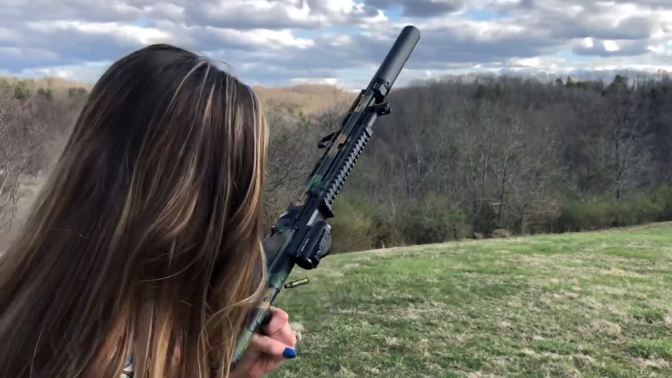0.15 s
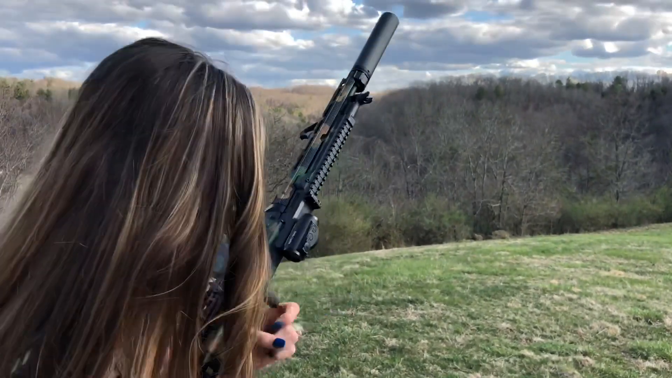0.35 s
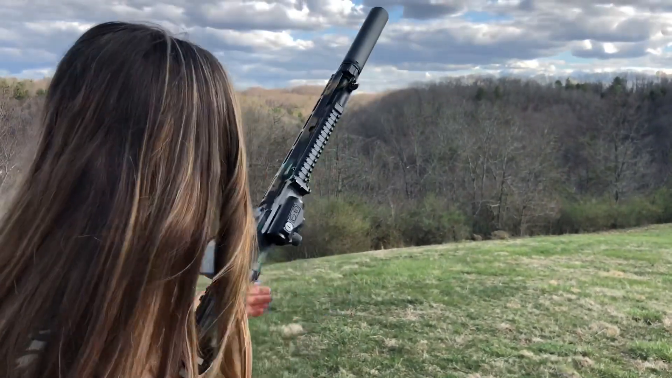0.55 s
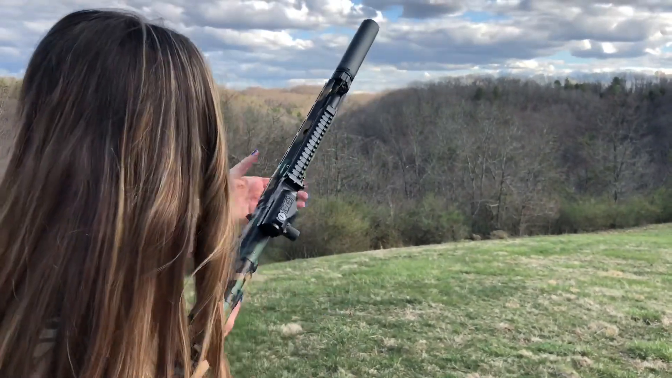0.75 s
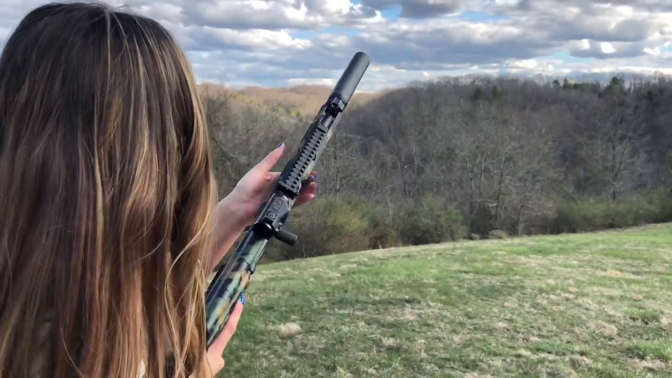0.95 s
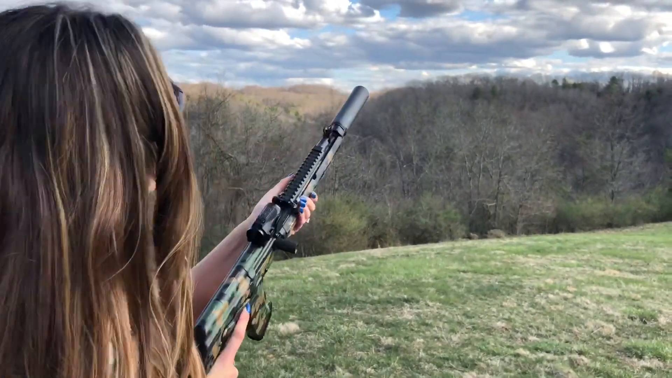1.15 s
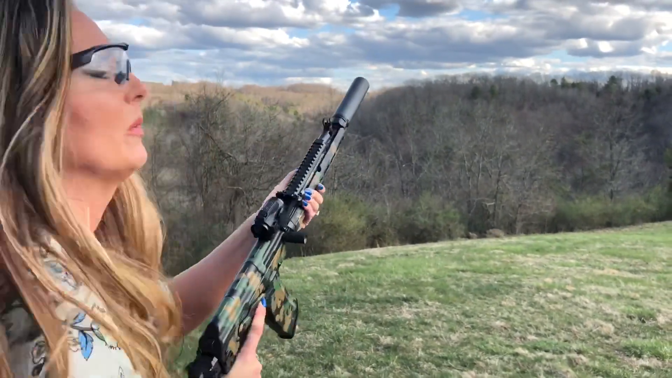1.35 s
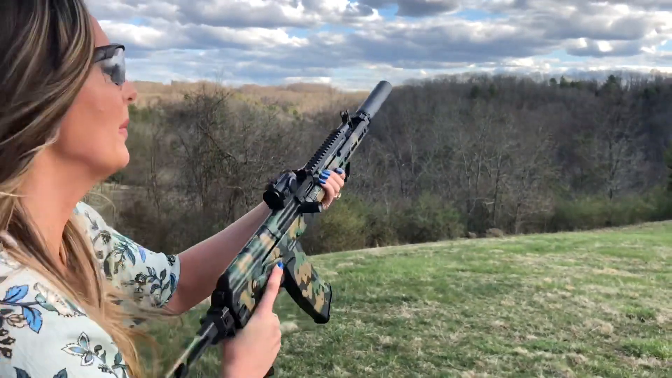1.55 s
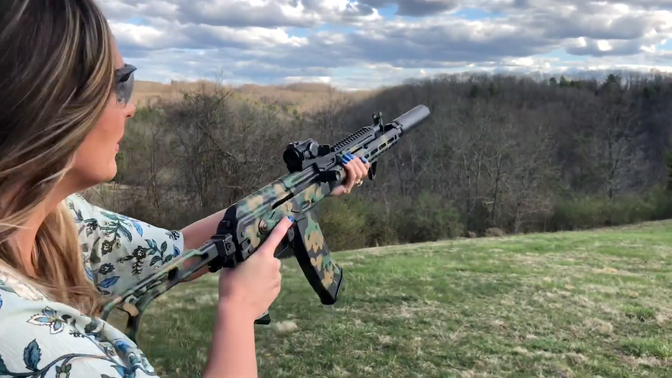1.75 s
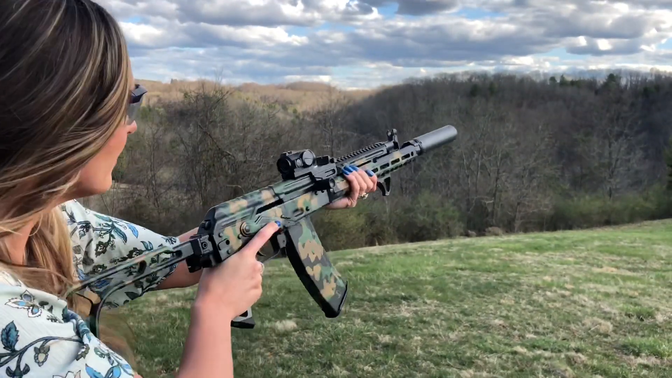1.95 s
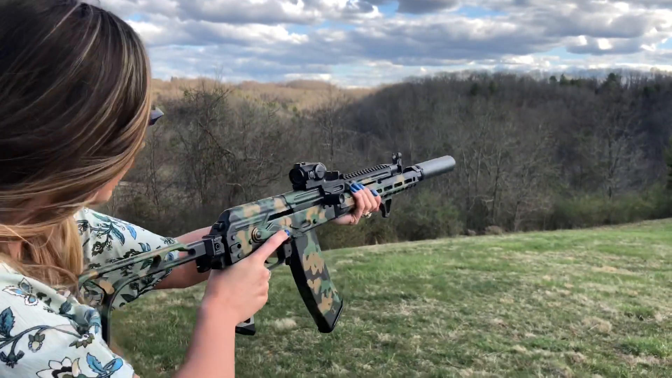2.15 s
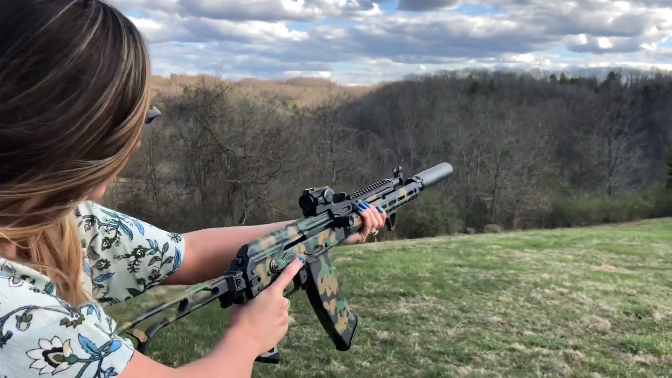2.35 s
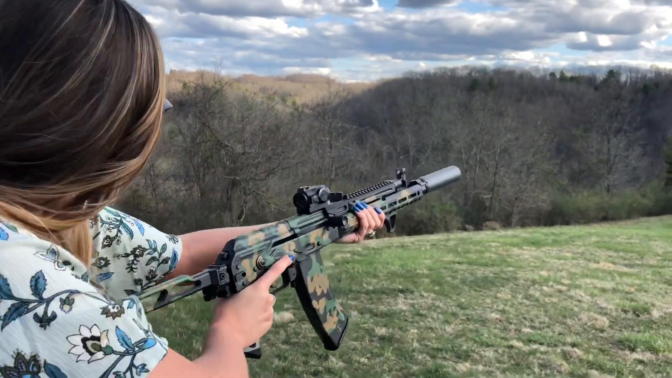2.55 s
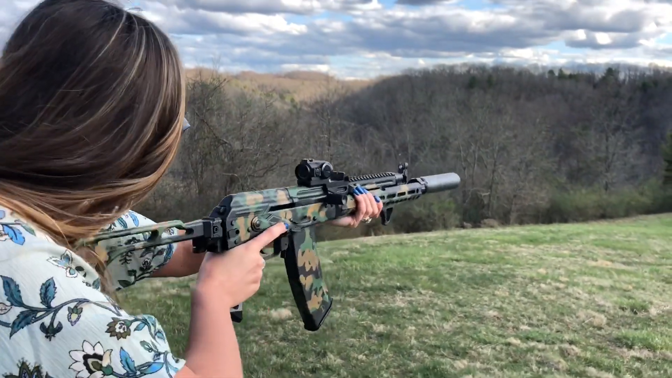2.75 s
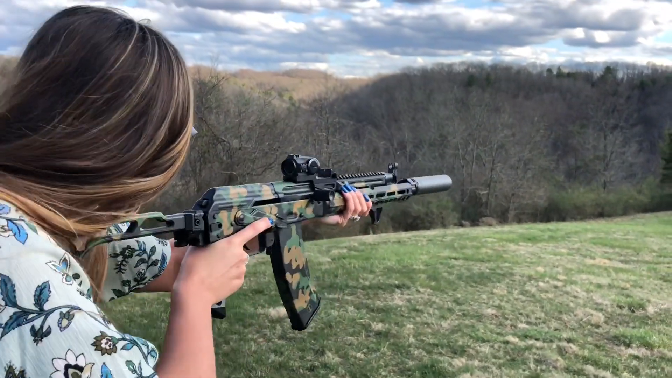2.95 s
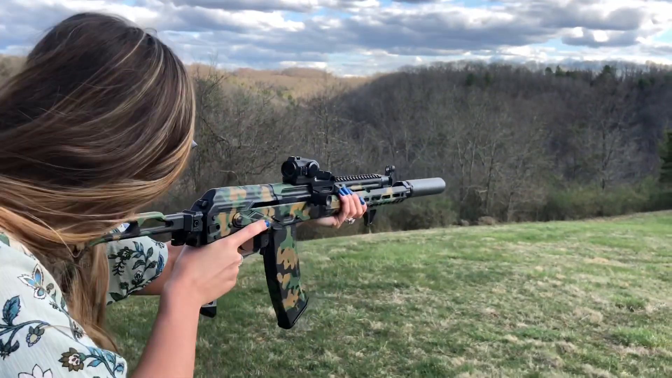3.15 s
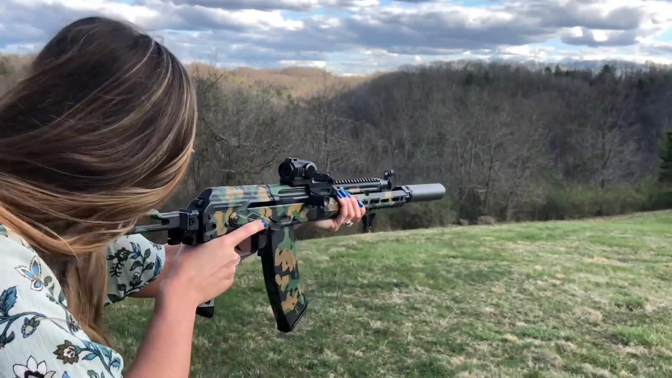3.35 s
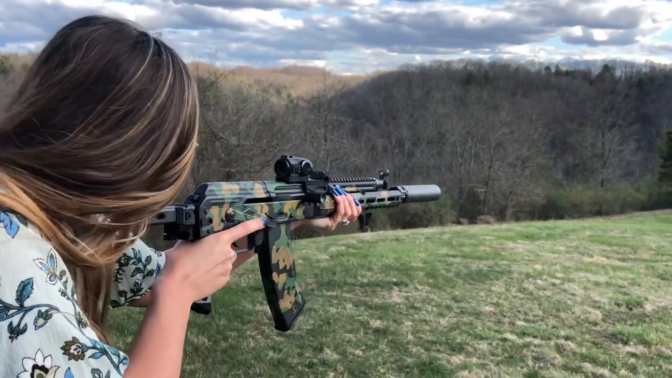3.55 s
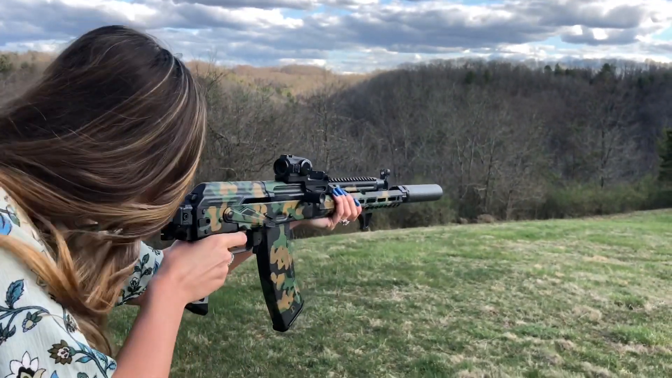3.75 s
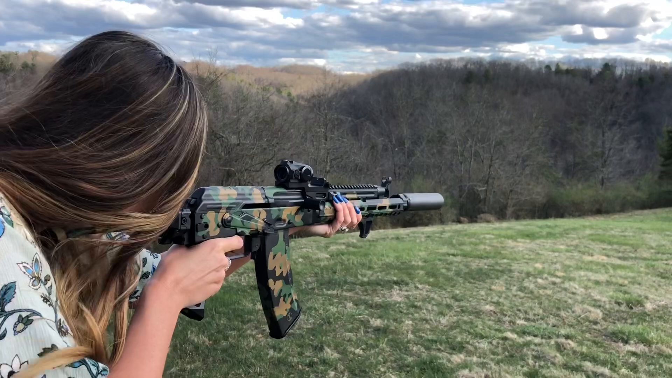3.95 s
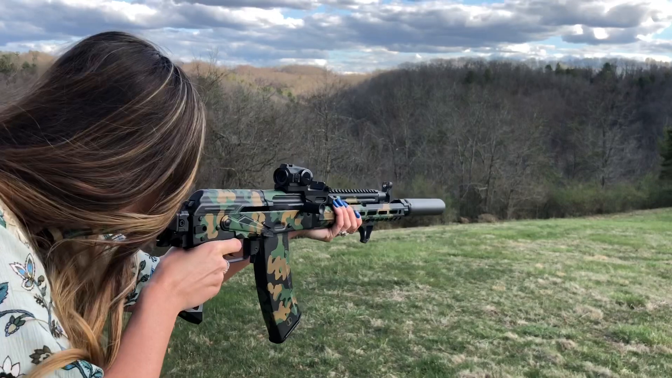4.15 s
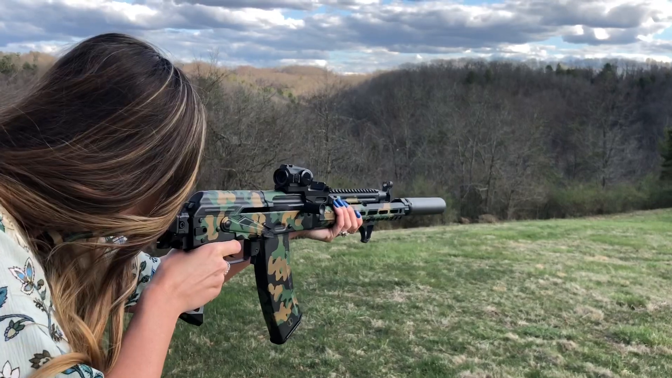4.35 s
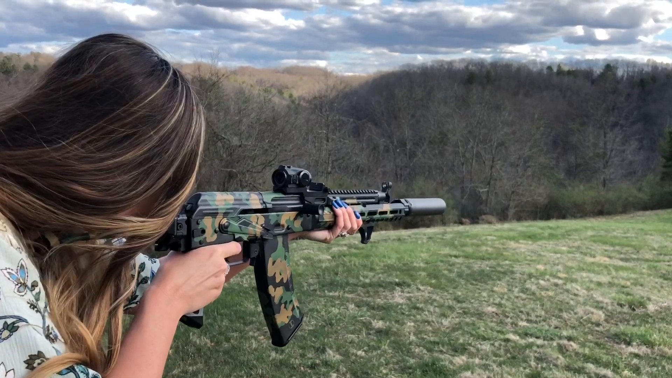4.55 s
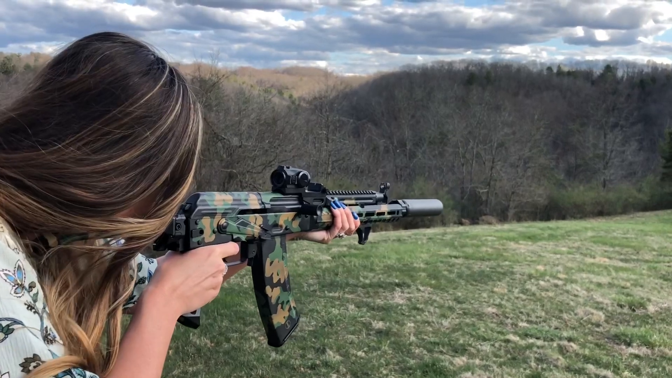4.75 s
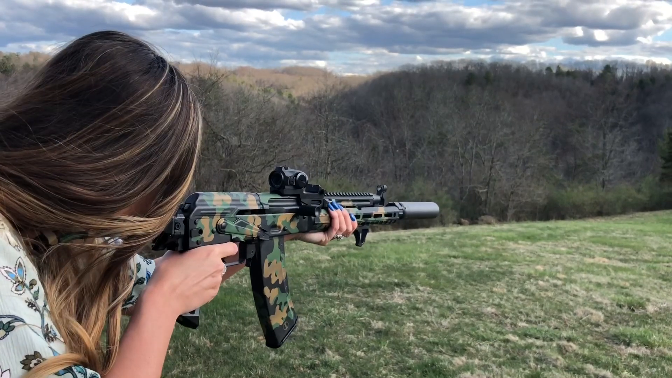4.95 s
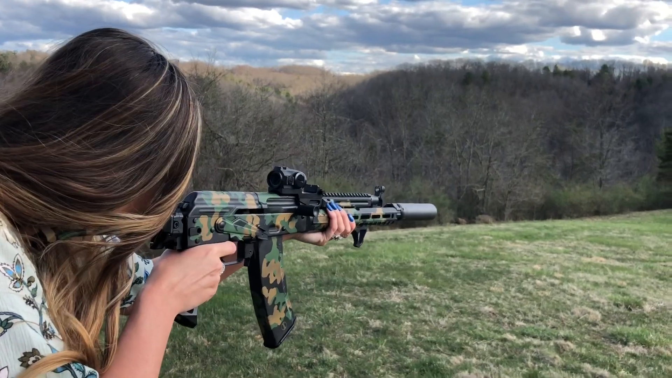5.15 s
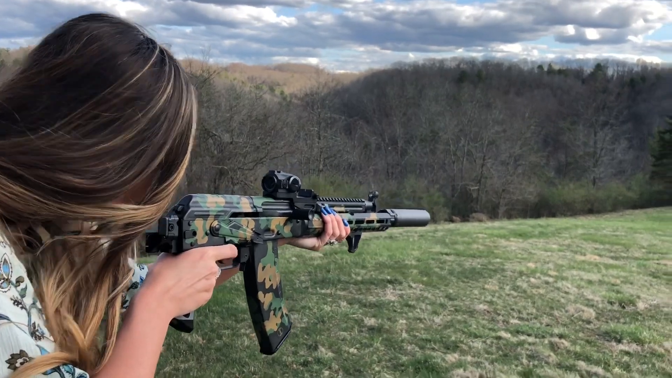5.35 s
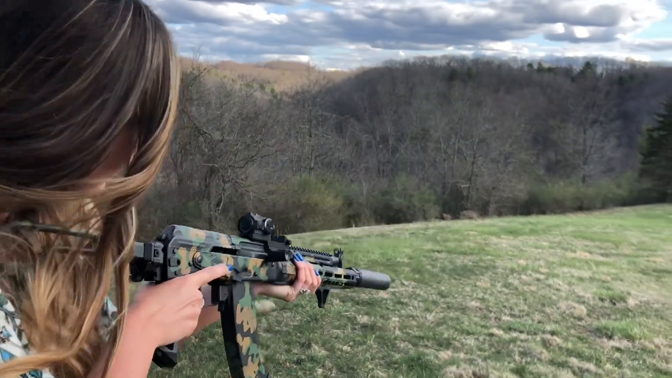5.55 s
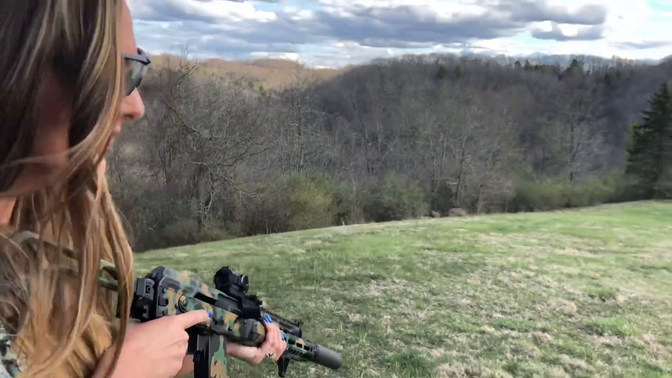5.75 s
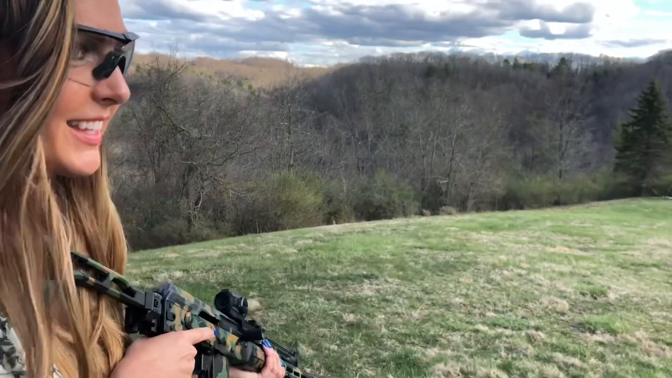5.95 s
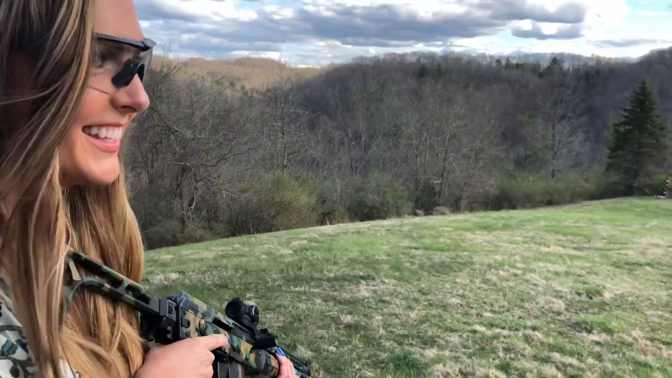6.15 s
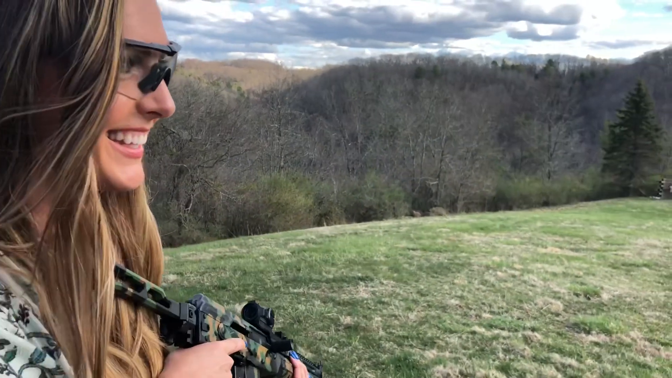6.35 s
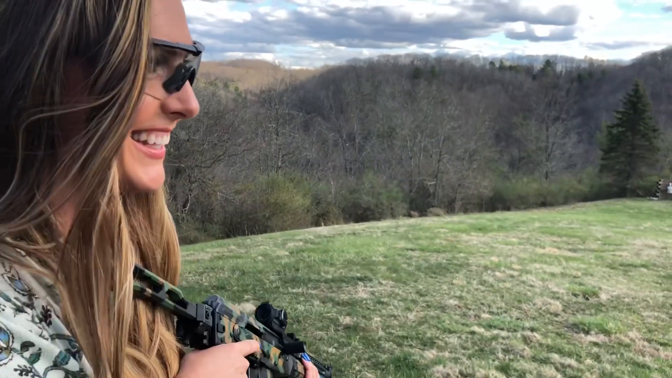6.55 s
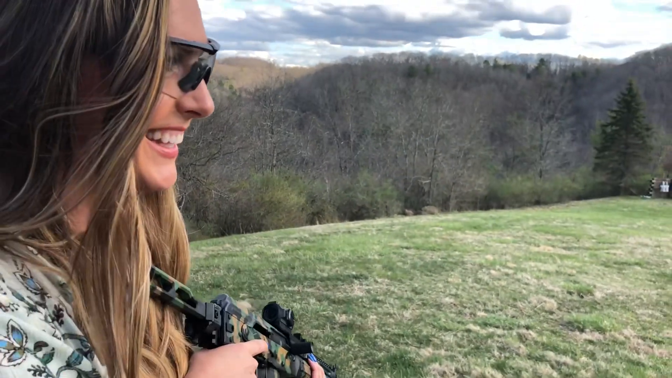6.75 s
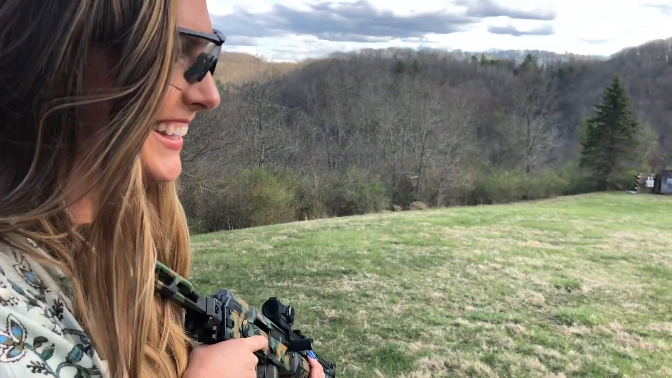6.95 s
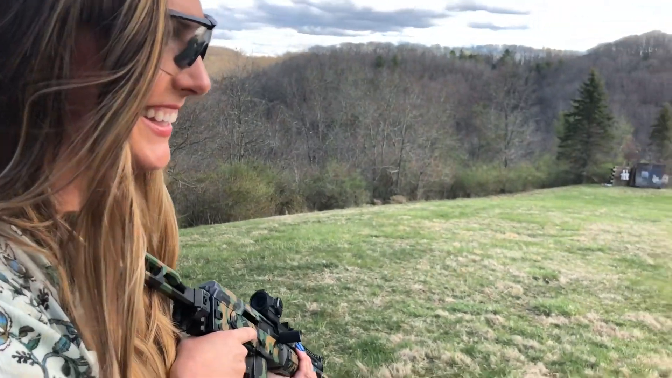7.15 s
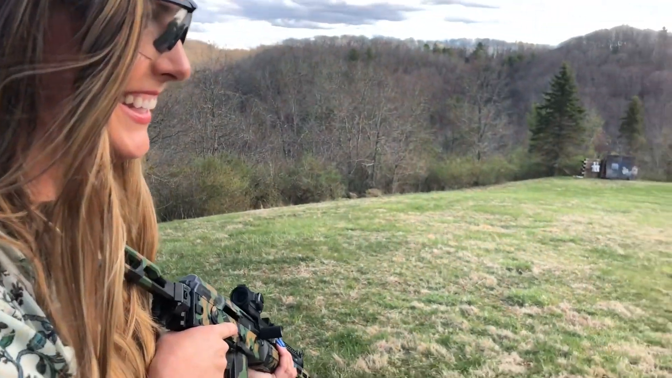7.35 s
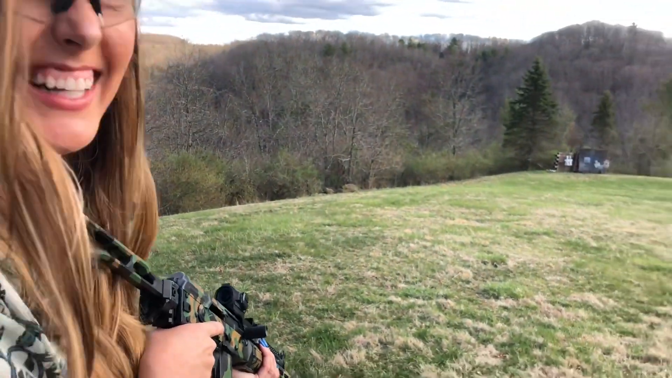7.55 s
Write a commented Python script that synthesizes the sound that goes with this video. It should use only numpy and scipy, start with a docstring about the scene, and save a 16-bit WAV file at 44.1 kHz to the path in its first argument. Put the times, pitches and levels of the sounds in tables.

```python
"""Suppressed rifle shot at a steel plate.

A rifle is cocked close by in a run of steel clacks, then fired once across a field edged by woods.
The muzzle pops and vents gas, the bolt cycles, the bullet hisses away and rings a distant plate,
and the spent case lands with a knock. Ground and trees echo the rifle.
Frogs peep far off, a bird whistles twice, and light wind puffs on the microphone."""
import sys
import numpy as np
from scipy import signal
from scipy.fft import rfft, irfft, next_fast_len
from scipy.io import wavfile
from scipy.ndimage import uniform_filter1d

SR = 44100
rng = np.random.default_rng(int(sys.argv[2]) if len(sys.argv) > 2 else 0)


def transcribe(signal):
    """Save signal, clipped to [-1, 1], as a 16-bit WAV file at the path in sys.argv[1]."""
    frames = np.atleast_2d(signal).T
    limited = np.clip(frames, -1, 1)
    pcm = np.round(limited * 32767).astype(np.int16)
    wavfile.write(sys.argv[1], SR, pcm)


N = 339129
TIME = np.arange(N) / SR
RELEASE_S, SLAM_S = .42, .523
SHOT_S, RELOAD_S, PLATE_S, CASE_S = 4.6052, 4.644, 5.0007, 5.4101
GRAIN_HZ = 800  # chatter rate within one metal contact

# bolt pulled, released, cycled by the shot:
# t/s, level/dB, treble/dB re level, thud/dB re level, t60/s, f/Hz of the part hit
BOLT_CLACKS = [(.015, -49, -10, 6, .04, 1403), (0.0241, -29.5, -2.5, -4.5, 0.042, 4705),
               (0.1002, -25, -1, -4.5, 0.044, 3480), (0.1218, -24, -7.5, -9, 0.031, 4480),
               (0.13, -24, 1.5, -6.5, 0.026, 7600), (0.144, -16.5, -1, -15, 0.027, 5596),
               (0.16, -14.5, 9, -1, 0.016, 9030), (.182, -29.5, -5, 7.5, 0.028, 950),
               (0.1906, -15.5, 10, -13.5, 0.013, 9500), (0.2035, -9.5, 1, -15, 0.013, 4110),
               (0.211, -16.5, -7, -10, 0.015, 3400), (0.2143, -17.5, -2, -0.5, .018, 1691),
               (0.2222, -17.5, 6.5, -9, 0.019, 7006), (.236, -33, -6, 4, 0.031, 950),
               (0.334, -46.5, -3.5, 2, 0.094, 3000), (0.4243, -36, -7, -4.5, 0.04, 3415),
               (0.4403, -23.5, -11, -4.5, 0.031, 3010), (0.457, -20.5, 2.5, -8.5, 0.015, 7990),
               (.466, -28.5, 1.5, -8.5, 0.037, 3500), (0.4789, -15.5, -4, -9, 0.026, 3190),
               (.484, -18, -3.5, -5.5, 0.035, 3000), (0.4915, -18.5, 4.5, -12.5, 0.016, 6533),
               (0.5011, -10, 4.5, -11.5, 0.014, 3160), (0.5081, -12.5, 6.5, -3.5, 0.018, 10070),
               (0.524, -23.5, 5.5, -9, 0.056, 10950), (4.573, -46.5, -5.5, 5.5, 0.15, 2000),
               (4.5976, -16.5, -2.5, -7.5, 0.028, 3400), (4.605, -11.5, 2.5, -11, .011, 2002),
               (4.6437, -6.5, 2, -12, 0.014, 2300)]
# strokes of the mechanism: t/s, length/s, start level/dB, end level/dB
BOLT_STROKES = [(.116, 0.062, -36, -36), (.188, .044, -30.5, -31), (.444, .044, -41, -27.5),
                (.484, .046, -29, -33)]
# receiver resonances: f/Hz, width/Hz, level/dB
RECEIVER_PEAKS = [(2780, 170, -5.5), (3290, 78, 1.5), (4089, 90, -11), (5096, 95, -5.5), (5820, 160, -5),
                  (6700, 600, -4), (7440, 420, -1), (8960, 200, -3.5), (11153, 110, -4.5)]
# modes of struck bodies: f/Hz, level/dB, t60/s
COVER_MODES = [(480, -7.5, 0.018), (890, -1, .03), (990, -4, 0.018), (1250, -6.5, 0.022),
               (1638.6, -9.5, 0.051)]  # hollow dust cover and magazine
SPRING_MODES = [(1658, -35, .09), (3085, -49.5, 0.68), (3220, -57, 2.0), (4317, -39.5, 0.2),
                (5080, -29, .11), (6708, -22.5, 0.1), (9959, -30.5, .14), (10580, -26, .14),
                (10690, -27.5, .1), (11024, -28.5, .11)]  # small parts, as the bolt slams home
CARRIER_MODES = [(900, -45, .07), (3750, -40, 0.23)]  # bolt carrier, closing on the next round
PLATE_MODES = [(875, -8.5, 0.87), (1128, -9.5, .88), (1714, -1.5, 0.62), (2470, 4, 0.29), (2830, -5, 0.59),
               (3250, 2, 0.31), (4081, -9, 0.58), (4650, -1, 0.41), (5820, -7, 0.39), (8160, -16, 0.48),
               (9670, -14, 0.42)]
CASE_MODES = [(958, -0.5, 0.074), (1263, -0.5, 0.038), (1686, -11, 0.059), (2630, -10, 0.044),
              (3306, 7.5, 0.023), (4500, -7, 0.039), (6920, -3, .012)]
# steel or hand sliding on the rifle: centre t/s, level/dB, length/s
RUB_EVENTS = [(.085, -63, .07), (.418, -59, .05), (0.521, -23.5, 0.02), (0.777, -56, .036),
              (1.092, -67.5, 0.064), (5.632, -70, .014)]
# noise spectra: f/Hz, density level/dB
GAS_SPECTRUM = [(100, -14), (1000, -9), (6000, -5.5), (16000, -7.5)]
FLIGHT_SPECTRUM = [(300, -11.5), (900, -4.5), (4400, -1), (16000, 3)]
SPLASH_SPECTRUM = [(500, -47), (750, -14), (1500, -2.5), (3200, -3), (5500, -5), (8500, -4.5), (11000, -19),
                   (16000, -35)]
ECHO_SPECTRUM = [(300, -19.5), (900, -3), (4000, 0), (7000, -4.5), (16000, -18)]
AIR_SPECTRUM = [(25, -11), (60, 3), (290, -1), (1000, -15.5), (2000, -21), (6000, -29), (16000, -35)]
# decay times: f/Hz, t60/s
FLIGHT_DECAY = [(4500, 3.4), (7000, 1.7), (16000, 0.8)]  # bullet hiss
CLANG_DECAY = [(4000, 0.78), (8000, 0.32), (16000, 0.23)]  # plate among the trees
WOODS_DECAY = [(3000, 1), (6000, 0.78), (10000, .42), (16000, .3)]  # rifle among the trees
# slaps from clumps of trunks: t/s
TRUNK_SLAPS = [4.805, 4.863, 4.915, 4.962]
# nearer frogs: t/s, f/Hz
NEAR_FROGS = [(1.15, 2640), (1.37, 2530), (1.51, 2460), (1.74, 2620), (2.47, 2570), (3.01, 2500),
              (7.15, 2540)]
# bird calls: t/s, level/dB
BIRD_CALLS = [(3.63, -66.5), (7.55, -65.5)]
# gusts on the microphone: t/s, length/s, level/dB
WIND_GUSTS = [(0.831, .1, -53.5), (3.03, .05, -47), (3.34, .05, -51.5), (3.652, .37, -49),
              (6.388, .17, -52), (6.71, .24, -51.5)]


def action(rise_s=.00013, rattle_db=-22, rattle_t60_s=.0991, grain_db=1.6, cover_rise_s=.00088,
           low_db=6, mid_db=5, high_db=1.17):
    """Each steel contact cracks and rattles, coloured by part and receiver, and rings the cover."""
    low, mid, high, parts = np.zeros((4, N))
    t = TIME[:SR // 4]
    grains = rms_one(amp(grain_db * wander(GRAIN_HZ)))
    for s, db, treble_db, thud_db, t60_s, part_hz in BOLT_CLACKS + chatter():
        decay = fade(t, t60_s) + amp(rattle_db) * fade(t, rattle_t60_s)
        envelope = amp(db) * decay * rise(t, rise_s) * grains[round(s * SR):][:len(t)]
        dull, hard, bright, tone = envelope * rng.standard_normal((4, len(t)))
        add(low, s, amp(thud_db) * dull)
        add(mid, s, hard)
        add(high, s, amp(treble_db) * bright)
        add(parts, s, resonate(tone, part_hz, width_hz=.18 * part_hz))
        cover = struck(COVER_MODES, samples=len(t), detune=.02) * rise(t, cover_rise_s)
        add(parts, s, amp(db + thud_db) * cover)
    steel = amp(mid_db) * band(mid, 2000, 6000) + amp(high_db) * band(high, 6000, 18000)
    steel = steel + sum(amp(db) * resonate(steel, hz, width_hz) for hz, width_hz, db in RECEIVER_PEAKS)
    add(steel, SLAM_S, struck(SPRING_MODES, samples=2 * SR) * rise(TIME[:2 * SR], .003))
    add(steel, RELOAD_S, struck(CARRIER_MODES))
    thud = amp(low_db) * band(low, 760, 1750)
    return steel + band(parts + thud, 460, SR, order=3)


def chatter(count=8, treble_db=-6, thud_db=0, t60_s=.045, uneven_db=1.5, range_hz=(1200, 6000)):
    """Light contacts, equally many per stroke, so quick strokes buzz denser. Rows as BOLT_CLACKS."""
    rows = []
    for start_s, length_s, first_db, last_db in BOLT_STROKES:
        travel = (np.arange(count) + rng.random(count) / 2) / count
        levels_db = first_db + (last_db - first_db) * travel + uneven_db * rng.standard_normal(count)
        pitches_hz = np.geomspace(*range_hz, count)[rng.permutation(count)]
        for s, db, hz in zip(start_s + length_s * travel, levels_db, pitches_hz):
            rows.append((s, db, treble_db, thud_db, t60_s, hz))
    return rows


def muzzle(pop_db=-14, start_hz=2800, end_hz=440, sweep_s=.0009, pop_s=.00099,
           thump_db=-26.5, thump_t60_s=.039, gas_db=-20, gas_t60_s=.22, vent_s=.035):
    """The muffled shot: a short pop that falls in pitch, a low thump and a jet of gas."""
    since = TIME - SHOT_S
    t = np.maximum(since, 0)
    cycles = end_hz * t + (start_hz - end_hz) * sweep_s * rise(t, sweep_s)
    pop = amp(pop_db) * t / pop_s * np.exp(1 - t / pop_s) * np.sin(2 * np.pi * cycles)
    thump = amp(thump_db) * fade(since, thump_t60_s) * band_noise(200, 560)
    jet = fade(since, gas_t60_s) * hold(t, vent_s, t60_s=.11)
    return pop + thump + amp(gas_db) * jet * noise(GAS_SPECTRUM)


def muzzle_pressure(peak_db=-42, lag_s=.02, swing_hz=70, swell_s=.01):
    """Muzzle gas pushes one slow swing of air at the microphone."""
    t = TIME - SHOT_S - lag_s
    return amp(peak_db) * np.exp(-(t / swell_s) ** 2) * np.cos(2 * np.pi * swing_hz * t)


def rubs():
    """Bright swishes: carrier on its rails, skin on the handguard."""
    out = np.zeros(N)
    for s, db, length_s in RUB_EVENTS:
        add(out, s - length_s / 2, amp(db) * soft_burst(length_s))
    return band(out, 3900, 16100)


def spent_case(ring_db=-31, tick_db=-28, tick_t60_s=.025):
    """The ejected case knocks once on something hard."""
    tick = rng.standard_normal(N) * fade(TIME - CASE_S, tick_t60_s)
    out = amp(tick_db) * band(tick, 1340, 11400)
    add(out, CASE_S, amp(ring_db) * struck(CASE_MODES) * rise(TIME[:SR], .00039))
    return out


def bullet(hiss_db=-46, whirr_db=-61, whirr_at_s=4.92, whirr_s=.09, flutter_db=1.8):
    """The receding bullet hisses and flutters; air takes the treble first; a whirr swells late."""
    hiss = amp(hiss_db) * dying_noise(FLIGHT_SPECTRUM, FLIGHT_DECAY, SHOT_S)
    whirr = amp(whirr_db) * np.exp(-((TIME - whirr_at_s) / whirr_s) ** 2) * band_noise(4220, 4580)
    flutter = amp(flutter_db * wander(rate_hz=45))
    return flutter * (hiss + whirr) * hold(TIME, PLATE_S, t60_s=.1)


def plate(splash_db=-23.5, hold_s=.013, splash_t60_s=.099, grain_db=1,
          ring_db=-39, trees_db=-36, boom_db=-44, boom_t60_s=.38):
    """Lead splashes on steel, the plate rings, and trees scatter the clang over a low boom."""
    t = TIME - PLATE_S
    grains = amp(grain_db * wander(GRAIN_HZ))
    hit = amp(splash_db) * (t > 0) * hold(t, hold_s, splash_t60_s) * grains * noise(SPLASH_SPECTRUM)
    add(hit, PLATE_S, amp(ring_db) * struck(PLATE_MODES) * rise(TIME[:SR], .0024))
    boom = amp(boom_db) * fade(t, boom_t60_s) * band_noise(79, 193)
    return hit + boom + amp(trees_db) * dying_noise(SPLASH_SPECTRUM, CLANG_DECAY, PLATE_S)


def ground(x, echo_db=-30, t60_s=.24):
    """Nearby ground scatters a little sound straight back."""
    return scatter(x, noise(ECHO_SPECTRUM) * fade(TIME, t60_s), echo_db)


def woods(x, echo_db=-36, delay_s=.108, rise_s=.004):
    """The tree line returns a late wash that grows duller."""
    swell = rise(np.maximum(TIME - delay_s, 0), rise_s)
    return scatter(x, dying_noise(ECHO_SPECTRUM, WOODS_DECAY, delay_s) * swell, echo_db)


def trunks(slap_db=-47.5, slap_s=.038):
    """Clumps of trunks return the shot as separate soft slaps."""
    out = np.zeros(N)
    for s in TRUNK_SLAPS:
        add(out, s - slap_s / 2, soft_burst(slap_s))
    return amp(slap_db) * band(out, 1750, 5700)


def frogs(chorus_db=-66.5, pitch_hz=2730, spread_hz=128, uneven_db=2.5, count=600,
          near_db=-63.8, blur_db=-69.5, wash_t60_s=.4):
    """A far chorus of random peeps, blurred by the woods; a few nearer, lower voices stand out."""
    chorus, near = np.zeros((2, N))
    times_s = rng.uniform(0, N / SR, count)
    deviations = np.clip(rng.standard_normal((count, 2)), -2, 2)
    for s, (pitch, loudness) in zip(times_s, deviations):
        add(chorus, s, amp(uneven_db * loudness) * peep(pitch_hz + spread_hz * pitch))
    for s, hz in NEAR_FROGS:
        add(near, s, peep(hz))
    wash = scatter(near, rng.standard_normal(N) * fade(TIME, wash_t60_s), db=0)
    blur = band_noise(2500, 2970, order=3)
    return amp(chorus_db) * rms_one(chorus) + amp(near_db) * (near + wash) + amp(blur_db) * blur


def peep(pitch_hz, length_s=.1, glide_hz=239):
    """One frog whistle, rising through its pitch."""
    u = np.linspace(0, 1, round(length_s * SR))
    hz = pitch_hz + glide_hz * (u - .5)
    return np.sin(np.pi * u) * np.sin(2 * np.pi * np.cumsum(hz) / SR)


def bird(start_hz=8150, end_hz=6430, call_s=.11):
    """Each call is a thin whistle that slides down and levels off."""
    out = np.zeros(N)
    u = np.linspace(0, 1, round(call_s * SR))
    hz = end_hz + (start_hz - end_hz) * (1 - u) ** 1.75
    call = np.abs(np.sin(np.pi * u ** .84)) * np.sin(2 * np.pi * np.cumsum(hz) / SR)
    for s, db in BIRD_CALLS:
        add(out, s, amp(db) * call)
    return out


def breeze(air_db=-63, drone_db=-73, drone_hz=239, puff_hz=66, spread_oct=.6, puff_s=.015, trim_db=-2):
    """Open-air rumble, a faint far drone, and puffs that swing the pressure on the microphone."""
    drone = rms_one(resonate(rng.standard_normal(N), drone_hz, width_hz=9))
    out = amp(air_db) * noise(AIR_SPECTRUM) + amp(drone_db) * drone
    t = TIME[:SR // 5] - .1
    envelope = np.exp(-(t / puff_s) ** 2)
    for s, db in puffs():
        pitch, phase = rng.random(2)
        hz = puff_hz * 2 ** (spread_oct * (pitch - .5))
        swing = np.cos(2 * np.pi * (hz * t + phase))
        eddies = band_noise(54, 185, samples=len(t))
        add(out, s + t[0], amp(db + trim_db) * envelope * (swing + .27 * eddies))
    return out


def puffs(max_count=10, gap_s=.044, uneven_db=.6):
    """Each gust breaks into an uneven run of puffs. Rows: t/s, level/dB."""
    rows = []
    for start_s, length_s, gust_db in WIND_GUSTS:
        delays_s = gap_s * (np.arange(max_count) + rng.random(max_count) / 2)
        levels_db = gust_db + uneven_db * rng.standard_normal(max_count)
        rows += [(start_s + s, db) for s, db in zip(delays_s, levels_db) if s < length_s]
    return rows


def struck(modes, samples=SR, detune=0):
    """One blow: decaying modes of random phase and slightly random level; detune jitters pitch."""
    t = TIME[:samples]
    out = np.zeros(samples)
    for hz, db, t60_s in modes:
        envelope = amp(db + rng.normal()) * fade(t, t60_s)
        mode_hz = hz * (1 + detune * rng.normal())
        out += envelope * np.sin(2 * np.pi * (mode_hz * t + rng.random()))
    return out


def dying_noise(spectrum, decay, start_s, patchy_db=2):
    """Noise that starts at start_s and dies in uneven patches, each frequency at its own rate."""
    hz, frames_s, cells = signal.stft(noise(spectrum), SR, nperseg=256)
    patches = uniform_filter1d(rng.standard_normal(cells.shape), size=6, axis=0)
    patches = rms_one(uniform_filter1d(patches, size=6, axis=1))
    cells = cells * amp(patchy_db * patches) * hold(frames_s, start_s, at_hz(decay, hz)[:, None])
    return signal.istft(cells, SR)[1][:N] * (TIME >= start_s)


def noise(spectrum):
    """Coloured noise, rms 1."""
    size = next_fast_len(N)
    gain = amp(at_hz(spectrum, np.fft.rfftfreq(size, 1 / SR)))
    return rms_one(irfft(rfft(rng.standard_normal(size)) * gain, size)[:N])


def band_noise(low_hz, high_hz, order=2, samples=N):
    """Band-passed noise, rms 1."""
    return rms_one(band(rng.standard_normal(samples), low_hz, high_hz, order))


def soft_burst(length_s):
    """White noise under a raised cosine."""
    samples = round(length_s * SR)
    return np.hanning(samples) * rng.standard_normal(samples)


def wander(rate_hz):
    """Low-passed noise, rms 1."""
    lowpass = signal.butter(2, rate_hz, fs=SR, output="sos")
    return rms_one(signal.sosfilt(lowpass, rng.standard_normal(N + SR))[SR:])


def scatter(x, response, db):
    """Convolve with the first second of an echo response, at energy gain db."""
    return amp(db) * signal.fftconvolve(x, rms_one(response[:SR]) / np.sqrt(SR))[:N]


def resonate(x, hz, width_hz):
    """Two-pole resonance, peak gain 1."""
    r = np.exp(-np.pi * width_hz / SR)
    numerator = np.array([1, 0, -1]) * (1 - r * r) / 2
    return signal.lfilter(numerator, [1, -2 * r * np.cos(2 * np.pi * hz / SR), r * r], x + 1e-18)


def band(x, low_hz, high_hz, order=2):
    """Causal band-pass, top edge capped at 0.45 SR."""
    edges_hz = [low_hz, min(high_hz, .45 * SR)]
    return signal.sosfilt(signal.butter(order, edges_hz, "band", fs=SR, output="sos"), x + 1e-18)


def rise(t, tau_s):
    """Exponential approach to 1."""
    return 1 - np.exp(-t / tau_s)


def fade(t, t60_s):
    """Exponential decay from t = 0, zero before."""
    return (t >= 0) * np.exp(-np.log(1000) * np.clip(t / t60_s, 0, 10))


def hold(t, until_s, t60_s):
    """1 up to until_s, then exponential decay."""
    return fade(np.maximum(t - until_s, 0), t60_s)


def at_hz(points, hz):
    """Interpolate a table over log frequency."""
    table_hz, values = np.transpose(points)
    return np.interp(np.log(np.maximum(hz, 1)), np.log(table_hz), values)


def add(out, s, piece):
    """Mix a piece in at time s."""
    i = max(round(s * SR), 0)
    out[i:i + len(piece)] += piece[:max(N - i, 0)]


def amp(db):
    """dB to gain."""
    return 10 ** (np.asarray(db) / 20)


def rms_one(x):
    """Scale to rms 1."""
    return x / np.sqrt(np.mean(x ** 2) + 1e-20)


def scene():
    """Rifle, echoes, bullet, plate and field, in mono."""
    rifle = action() + muzzle()
    # the freed bolt and the shot carry to the trees; the pull under the hand does not
    echoes = ground(rifle) + woods(rifle * (TIME > RELEASE_S)) + trunks()
    close = rifle + muzzle_pressure() + rubs() + spent_case()
    field = bullet() + plate() + frogs() + bird() + breeze()
    return (close + echoes + field)[None]


def record(dry):
    """Soft clip, then a steep low-pass."""
    cutoff_hz = 15900
    rounded = 1.307 * np.tanh(dry / 1.277)
    return signal.sosfilt(signal.ellip(10, .1, 80, cutoff_hz, fs=SR, output="sos"), rounded)


dry = scene()
out = record(dry)
transcribe(out)
```